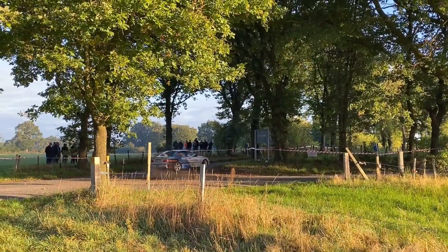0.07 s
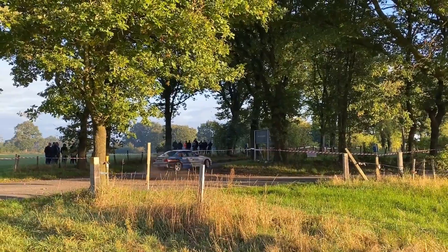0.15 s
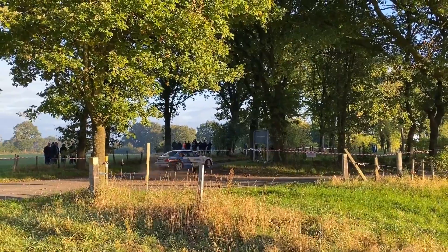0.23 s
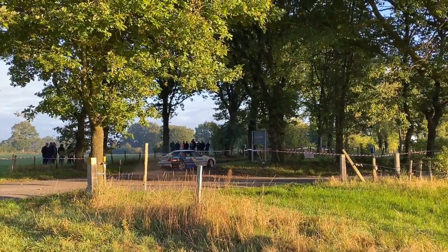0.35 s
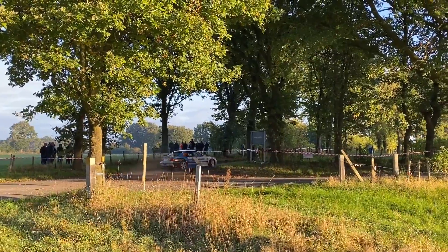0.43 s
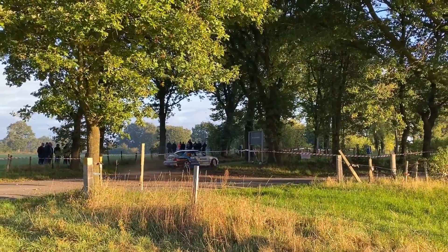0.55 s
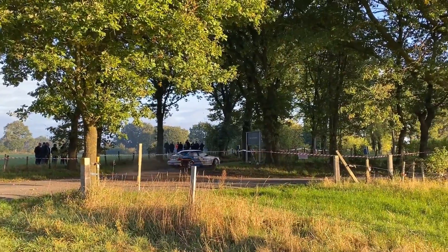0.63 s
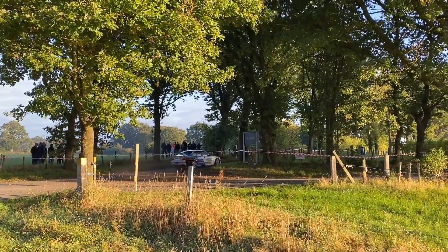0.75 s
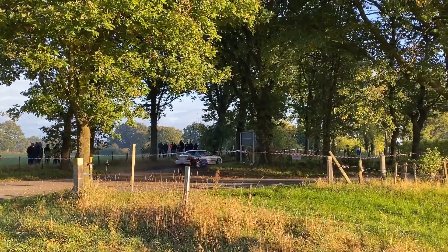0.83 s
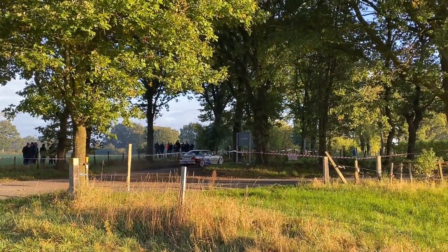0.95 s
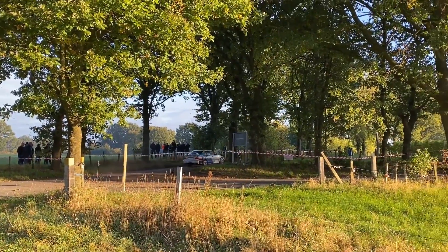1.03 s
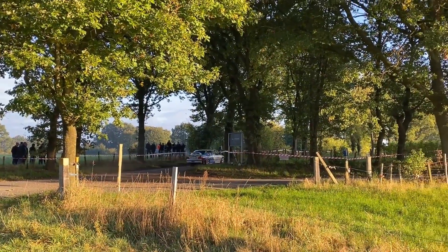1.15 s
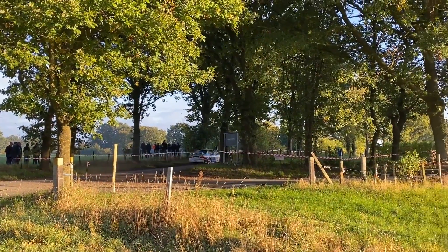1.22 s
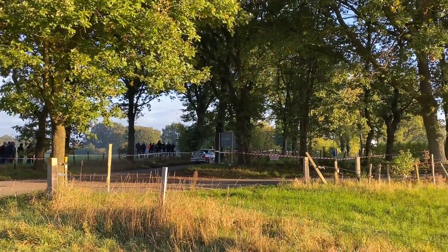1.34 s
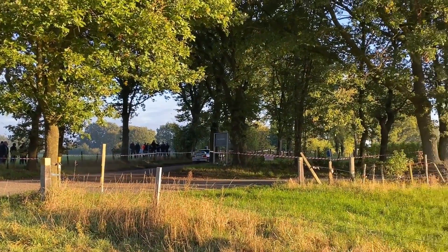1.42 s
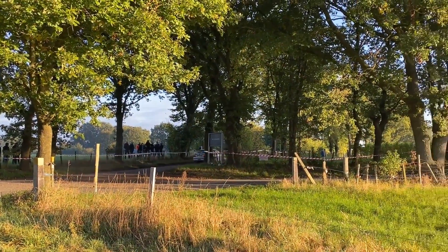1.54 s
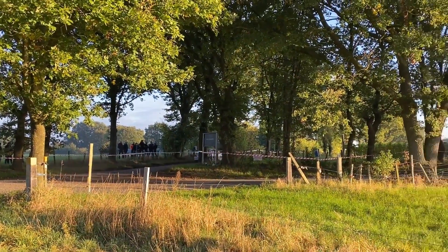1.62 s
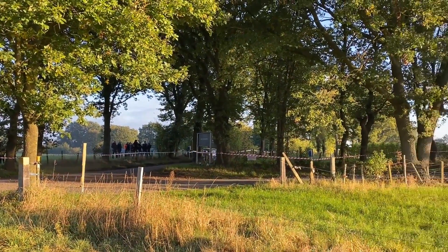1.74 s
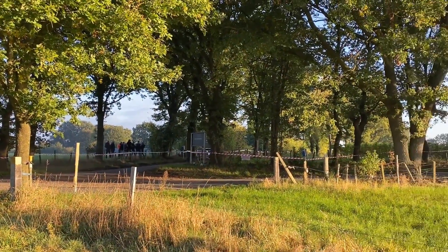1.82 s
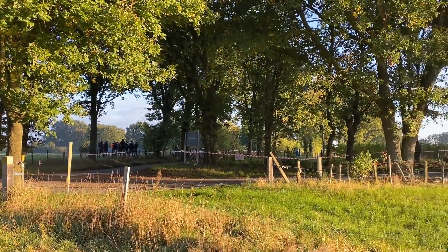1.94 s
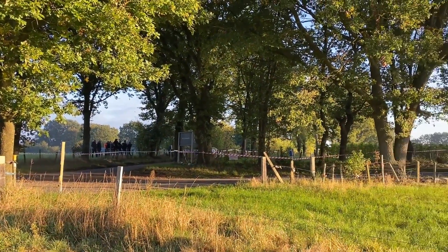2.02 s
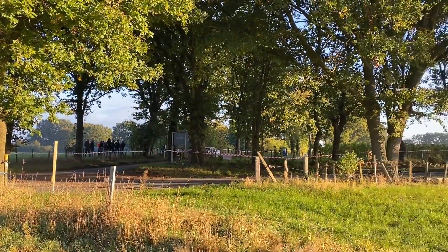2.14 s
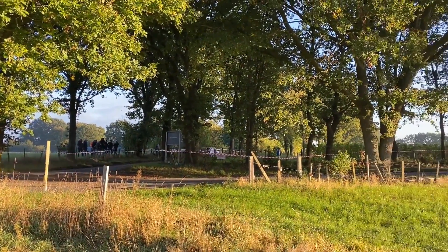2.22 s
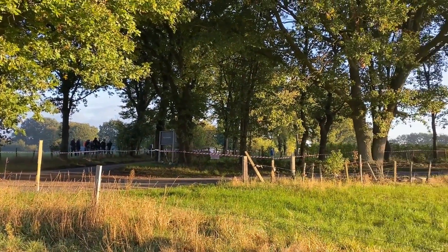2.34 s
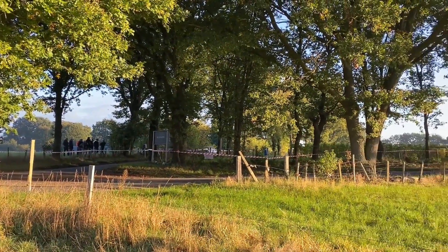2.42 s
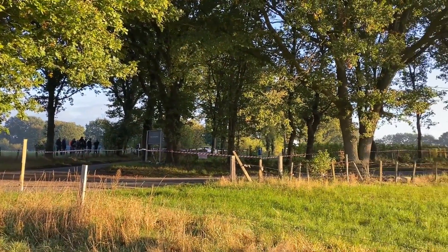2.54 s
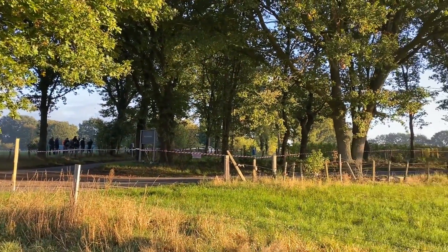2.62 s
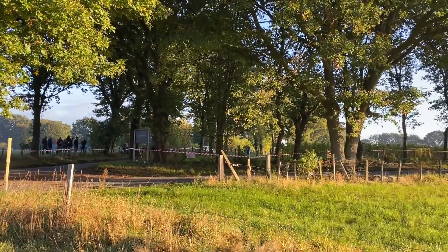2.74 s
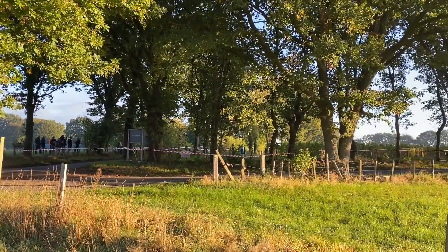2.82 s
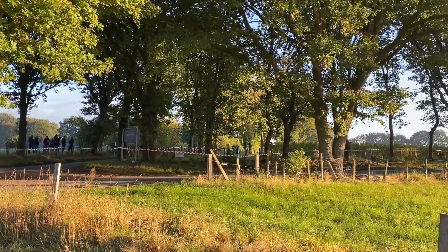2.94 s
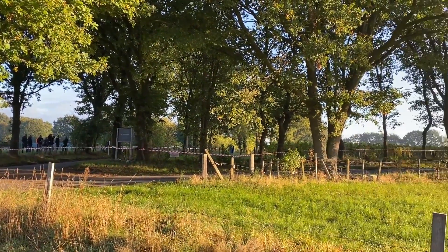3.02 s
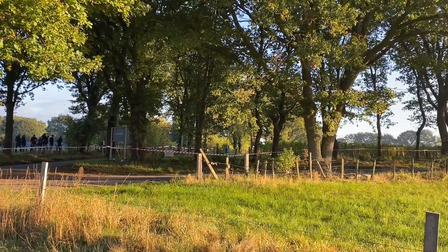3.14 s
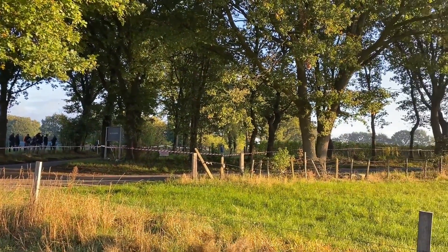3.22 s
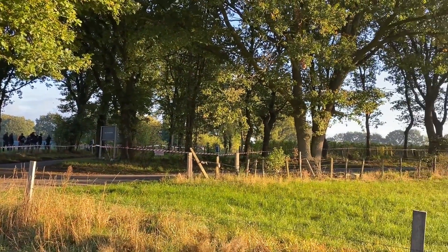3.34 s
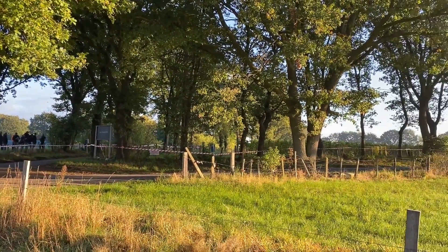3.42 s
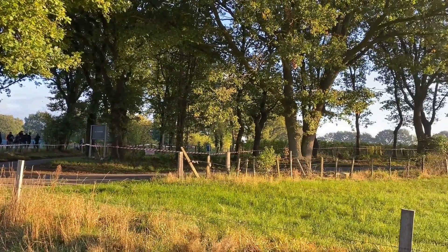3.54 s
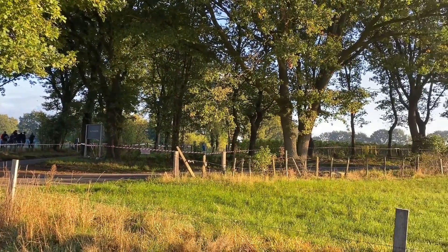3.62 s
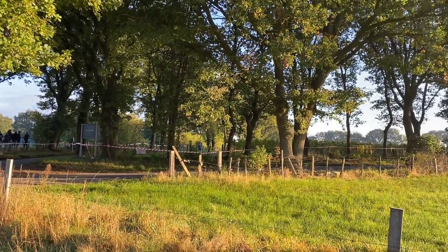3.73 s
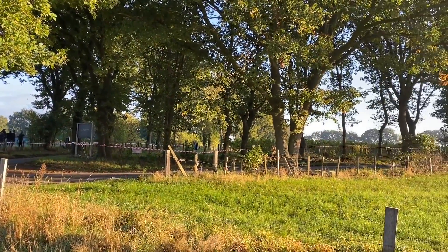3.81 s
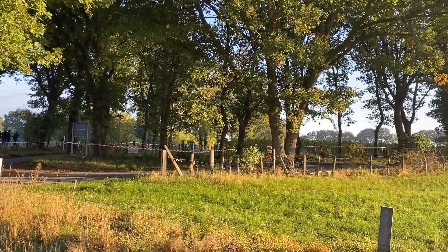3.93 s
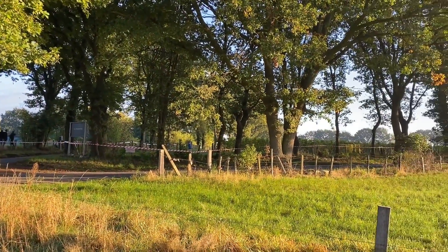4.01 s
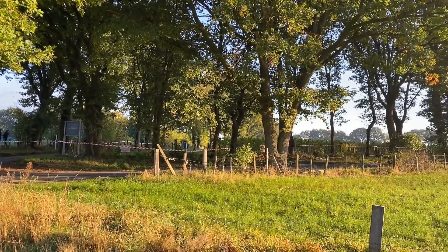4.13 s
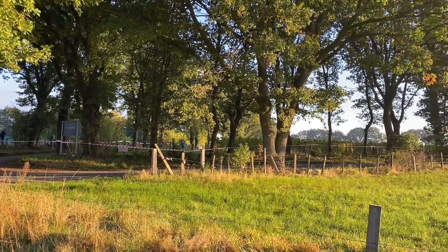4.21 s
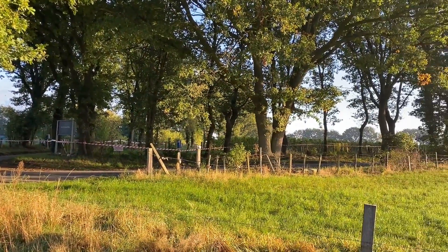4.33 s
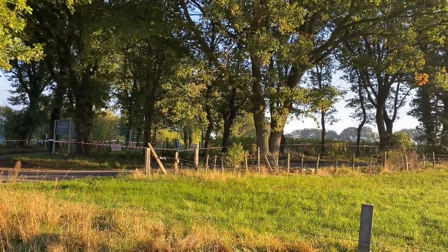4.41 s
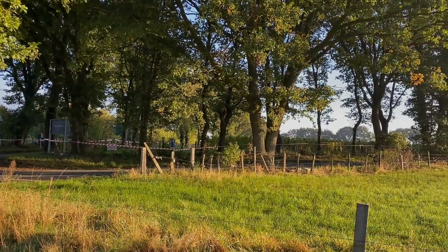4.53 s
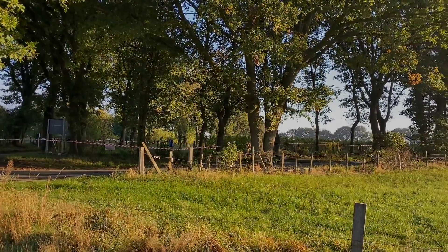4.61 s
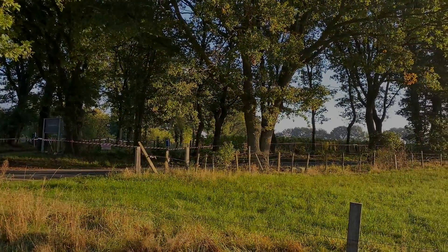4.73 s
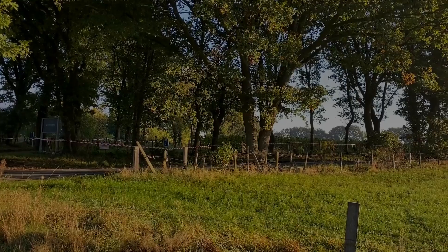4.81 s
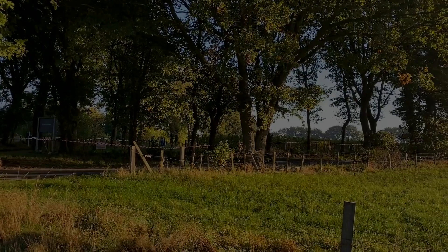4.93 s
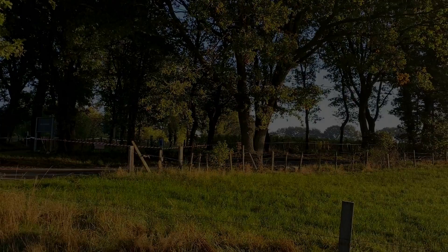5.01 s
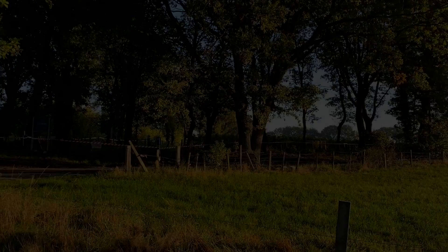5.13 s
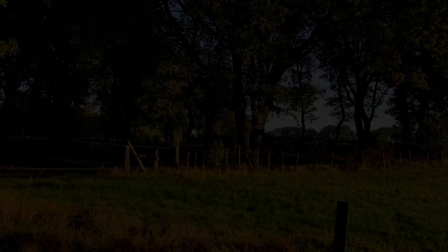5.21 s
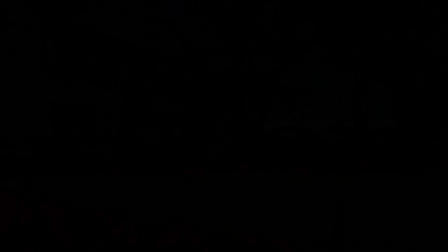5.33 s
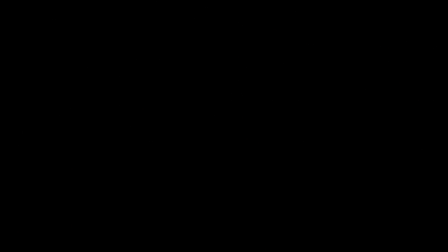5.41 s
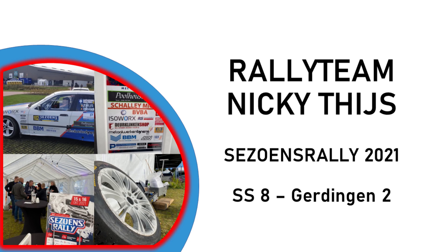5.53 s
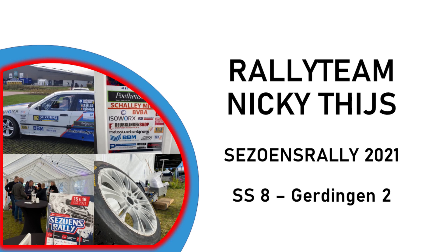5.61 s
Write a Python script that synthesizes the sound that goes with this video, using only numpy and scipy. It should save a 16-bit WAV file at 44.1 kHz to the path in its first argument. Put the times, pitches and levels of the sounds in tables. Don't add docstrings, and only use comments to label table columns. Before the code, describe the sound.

A four-cylinder rally car slides out of a corner with tyre chirps, then accelerates away through two gear changes and fades to silence.

```python
import sys
import numpy as np
from scipy import signal
from scipy.fft import rfft, irfft, next_fast_len
from scipy.io import wavfile
from scipy.ndimage import uniform_filter1d

SR = 44100
rng = np.random.default_rng(int(sys.argv[2]) if len(sys.argv) > 2 else 0)


def to_wav(s):
    ch = np.atleast_2d(s).T
    pcm = np.round(np.clip(ch, -1, 1) * 32767)
    wavfile.write(sys.argv[1], SR, pcm.astype(np.int16))


def gain_from_db(level_db):
    decades = np.asarray(level_db, float) / 20
    return 10 ** decades


N = 250047

# time_s, crank_hz
CRANK_SPEED = [(0.0, 105.7), (0.15, 100.6), (0.46, 106.3), (0.69, 106.9), (0.85, 104.7), (1.3, 89.15),
               (1.42, 89.2), (1.83, 105.2), (2.58, 132.2), (2.86, 142.3), (3.13, 139.0), (3.19, 130.7),
               (3.3, 123.3), (4.19, 145.3), (4.36, 140.8), (4.53, 119.1), (4.63, 124.4), (5.38, 135.4)]
# lift_s, pick_up_s, clutch_wait_s
GEAR_CHANGES = [
    (2.915, 3.098, 0.038),
    (4.142, 4.287, 0.08),
]
# time_s, level_db, tailpipe_aim_db, brightness_db, cylinder_unevenness_db
EXHAUST_DRIVE = [(0, -15, -10.5, 1.5, -15), (.45, -14.5, -11, 2, -5.5), (.85, -18, -8, 1.5, -5),
                 (1.05, -15, -6, -1.5, 1.5), (1.25, -13.5, -8.5, 0.5, 4), (1.55, -15, -3.5, -5.5, 3.5),
                 (1.8, -23, -1.5, -2.5, -4), (2.05, -19.5, -6.5, -10.5, -2.5), (2.4, -23.5, -8, 2.5, -8.5),
                 (2.65, -28.5, 5.5, -8, 6.5), (2.92, -31, 2.5, 3.5, 13.5), (3.15, -29.5, 2, -11, 0),
                 (3.45, -26.5, -2, -2.5, -3), (3.8, -25, -5, -2.5, 2.5), (4.1, -32.5, -3, -19, 2),
                 (4.4, -30, -6, -9, 7), (4.7, -30.5, -5, 0.5, 11.5), (5.2, -31.5, -7.5, -4, -5)]
# multiple_of_crank, level_re_lead_db, unsteadiness_db
CRANK_ORDERS = [(1, -23.5, 0), (1.5, -36.5, -3), (2, -1, 1), (3, -16.5, 2.4), (4, 2, 1.6), (5, -5.5, 1.8),
                (6, -1.5, 2)]
# freq_hz, gain_db
HEADER_GAIN = [(350, -6.5), (410, -2.5), (470, -2), (530, 2), (580, -1.5), (650, 3.5), (750, -4), (870, -5)]
# freq_hz, gain_db
PIPE_GAIN = [(600, 4), (830, -4.5), (960, -7), (1060, -15.5), (1300, -25), (1520, -26), (1800, -16),
             (2100, -34.5), (2600, -27)]
# time_s, freq_hz, gain_db, half_length_s
PASSING_DIPS = [(0.115, 202, -7, 0.037), (0.115, 416, -9.5, 0.039), (1.216, 823, 6.5, 0.17),
                (0.375, 208, -8, .07), (0.346, 422, -2, 0.031), (0.398, 528, -10, 0.03),
                (.45, 638, -8.5, 0.034), (0.64, 614, 4.5, 0.053), (0.645, 855, -16, 0.026),
                (1.03, 479.7, -16, 0.088), (1.592, 610, 9.5, 0.088), (2.124, 232, -6, 0.068),
                (2.265, 487, -6.5, 0.059), (2.465, 646, -10, .06), (2.332, 736, -15, 0.026),
                (2.5, 520, -8, 0.053), (2.6, 532, 2, 0.031), (2.726, 556.2, -14, 0.087),
                (2.74, 836, -13, 0.069), (3.147, 550, 3.5, 0.033), (3.19, 525, -16, .02),
                (3.23, 769, -22, 0.051), (3.562, 779, -19, 0.057), (3.691, 264.5, -7, 0.036),
                (3.9, 555, -8, 0.065), (3.94, 685, -1, 0.048), (3.7, 530, -10, 0.23),
                (4.125, 575, -5, 0.035), (4.563, 490, -6, 0.049), (2.3, 706, 1.5, 0.11)]
# time_s, gas_force_db, pipe_boom_db, road_roughness_db
GAS_AND_ROAD = [(0, -42, -1, 0.5), (.1, -41, -1, 4), (.4, -38, -3.5, 2.5), (.6, -36.5, -4, 0),
                (.8, -40, -0.5, -2.5), (1.05, -38.5, 1, 1.5), (1.3, -41, -0.5, -0.5),
                (1.6, -40.5, -0.5, -4), (1.9, -42, 0, 3.5), (2.2, -40.5, 0, 5), (2.45, -39.5, 3, 1.5),
                (2.9, -34.5, -4, -2.5), (3.2, -41.5, 3, 3), (3.5, -39.5, -1, 0.5), (4.1, -36.5, -4.5, -1),
                (4.4, -42, 3.5, 1.5), (4.6, -42.5, -1.5, 2), (5, -43, 0, 1)]
# freq_hz, level_db
RUMBLE_SPECTRUM = [(20, -37), (45, -12.5), (85, 7.5), (140, 1.5), (260, 8), (500, -50.5)]
# freq_hz, level_db
ROAR_SPECTRUM = [(100, -30), (200, -8), (350, -1), (620, 5.5), (900, 3), (1250, -7), (1600, -22.5)]
# freq_hz, level_db
RASP_SPECTRUM = [(800, -31.5), (1250, 3), (1550, -6), (1900, 0.3), (2350, -3), (2800, -12), (3600, -49.5)]
# freq_hz, level_db
HISS_SPECTRUM = [(2200, -6), (3100, 1), (4500, -3), (6000, -9), (8200, -9), (11000, -23.5), (16000, -46)]
# freq_hz, likeness_0_to_1
CHANNEL_LIKENESS = [(60, 1), (180, 1), (550, 0.51), (1650, 1), (4970, 0.47), (15000, 0.29)]
# start_s, length_s, pitch_hz, glide_hz_per_s, level_db
TYRE_CHIRPS = [
    (0.038, 0.079, 1393, -3200, -28.5),
    (0.402, 0.16, 1173, -300, -29.5),
    (0.54, 0.064, 1245, -400, -23.5),
    (0.588, 0.053, 1201, -200, -24.5),
    (0.651, 0.081, 1195, 53, -23),
    (0.73, 0.043, 1237, -300, -25),
]
# time_s, level_db, pitch_hz, t60_s
PIPE_THUMPS = [
    (2.919, -27.5, 162.2, 0.11),
    (3.076, -24, 515, 0.022),
    (3.097, -26, 104, 0.073),
    (4.152, -28, 109.5, 0.06),
    (4.215, -35.5, 151.3, .06),
    (4.286, -24.5, 189, 0.0505),
    (4.451, -20, 610, 0.031),
]
# freq_hz, left_minus_right_db
MIC_LEAN = [(40, 3.5), (150, -1.6), (350, -0.2), (700, 3), (1400, 2), (2800, 2.5), (5500, 3), (10000, -1.5)]
# freq_hz, left_lead_rad
MIC_LEAD = [(60, .05), (200, 0.28), (400, 0.51), (650, 0.46), (1000, 1), (2500, 0.94), (6000, 0.39)]
# low_hz, high_hz, open_share, gain_db
MID_BANDS = [(8300, 8650, .85, 3), (8650, 8850, .3, 1), (9300, 9600, .08, 1), (9640, 9810, 1.2, 13),
             (10000, 10400, .08, 1), (10450, 11280, .9, 3), (11950, 12420, .9, 5), (12600, 13500, .1, 1),
             (13850, 14280, .75, 6), (14400, 15000, .06, 1), (15050, 15780, .2, 3)]
# low_hz, high_hz, open_share, gain_db
SIDE_BANDS = [(8300, 9050, .2, 3), (9700, 10250, 1.1, 6), (10400, 11100, .08, 1), (11700, 12050, .85, 9),
              (12700, 13500, .75, 3), (13700, 14100, .08, 1), (14200, 14500, .5, 8)]


def evened(x):
    return x / np.sqrt(np.mean(x ** 2) + 1e-20)


def read(points, hz):
    f, value = np.transpose(points)
    return np.interp(np.log(hz + 1), np.log(f + 1), value)


def curves(table):
    s, *columns = np.transpose(table)
    return [np.interp(np.arange(N) / SR, s, c) for c in columns]


def wander(hz, count):
    slow_rate_hz = 400
    white = rng.standard_normal((count, N * slow_rate_hz // SR + 100))
    slow = signal.lfilter(*signal.butter(2, hz / (slow_rate_hz / 2)), white)
    steps = np.arange(N) * slow_rate_hz / SR + 90
    return np.array([np.interp(steps, np.arange(len(row)), evened(row)) for row in slow])


def lifted(fall_s, rise_s, waits):
    t = np.arange(N) / SR
    shut = np.zeros(N)
    for lift_s, pick_s, bite_s in GEAR_CHANGES:
        closing = (t - lift_s) / fall_s
        opening = (pick_s + waits * bite_s - t) / rise_s + 0.5
        shut += np.clip(np.minimum(closing, opening), 0, 1)
    return shut


def crank_turns():
    unevenness = 1 + 0.002 * wander(hz=20, count=1)[0]
    return np.cumsum(curves(CRANK_SPEED)[0] * unevenness) / SR


def passing_dip_db(hz):
    step, spread = 256, 0.091
    t = np.arange(0, N, step) / SR
    gain_db = np.zeros(len(t))
    for s, at_hz, db, half_s in PASSING_DIPS:
        off_time = (t - s) / half_s
        off_pitch = np.log(hz[::step] / at_hz) / spread
        gain_db += db * np.exp(-off_time ** 2 - off_pitch ** 2)
    return np.interp(np.arange(N) / SR, t, gain_db)


def exhaust(turns):
    top_order, rougher_per_s = 22, 0.08
    lift_firing_db, lift_upper_db = -13, -23.5
    hz = curves(CRANK_SPEED)[0]
    level, aim, bright, uneven = curves(EXHAUST_DRIVE)
    shut = lifted(fall_s=0.014, rise_s=0.034, waits=0)
    clutch_shut = lifted(fall_s=0.032, rise_s=0.047, waits=1) ** 0.4
    firing = level + lift_firing_db * shut
    upper = level + aim + lift_upper_db * shut
    late = level + aim + lift_upper_db * clutch_shut
    rougher = 1 + rougher_per_s * np.arange(N) / SR

    orders = [*CRANK_ORDERS, *((k, 0, 1.4) for k in range(7, top_order + 1))]
    fades, slips, drifts, spreads = (wander(hz=f, count=len(orders)) for f in (5.6, 42, 1.35, 8.6))
    out = np.zeros((2, N))
    for (k, db, unsteady_db), fade, slip, drift, spread in zip(orders, fades, slips, drifts, spreads):
        if k < 2:
            lead = firing + 0.22 * uneven
        elif k == 2:
            lead = firing
        elif k == 3:
            lead = firing + uneven
        elif k == 4:
            lead = upper + read(HEADER_GAIN, k * hz)
        elif k <= 6:
            lead = late + read(HEADER_GAIN, k * hz)
        else:
            lead = late + bright + read(PIPE_GAIN, k * hz)
        order_db = lead + db + unsteady_db * rougher * fade
        if k < 10:
            order_db = order_db + passing_dip_db(k * hz)
        phase = 2 * np.pi * k * turns + np.pi * (k == 2) + np.pi / 2 * (k % 2)
        phase = phase + k * slip / 30 + drift * min(k - 2, 3) / 6
        apart = 0.03 * k * spread * np.array([[1], [-1]])
        out += np.sqrt(2) * gain_from_db(order_db) * np.cos(phase + apart)
    return out


def noise(shape, patchy_db, size=8):
    air_db_per_s = 3
    hz = np.fft.rfftfreq(1024, 1 / SR)
    a, b, c, d, patches = rng.standard_normal((N // 256 + 5, 513, 5)).T
    patches = uniform_filter1d(patches, size=size, axis=0)
    patches = evened(uniform_filter1d(patches, size=10, axis=1))
    same = read(CHANNEL_LIKENESS, hz)[:, None]
    left = a + 1j * b
    right = same * left + np.sqrt(1 - same ** 2) * (c + 1j * d)
    z = np.array([left, right])
    frame_s = np.arange(z.shape[2]) * 256 / SR
    air_loss_db = air_db_per_s * np.outer((hz / 12000) ** 2, frame_s)
    z = z * gain_from_db(read(shape, hz)[:, None] + patchy_db * patches - air_loss_db)
    return evened(signal.istft(z, nperseg=1024, noverlap=768)[1][:, :N])


def road_rumble():
    level_db, loss_db_per_s, lift_db = -38.5, -1.5, 6.5
    _, _, road = curves(GAS_AND_ROAD)
    shut = lifted(fall_s=0.011, rise_s=0.03, waits=0.4)
    rumble_db = level_db + road + loss_db_per_s * np.arange(N) / SR + lift_db * shut
    return gain_from_db(rumble_db) * noise(RUMBLE_SPECTRUM, patchy_db=0.0)


def gas_noise(turns):
    lift_gas_db, lift_roar_db, roar_db = -13, -9.5, 3
    slide_db, grip_s, grip_over_s = 8, 2.93, 2.54
    t = np.arange(N) / SR
    gas, boom, _ = curves(GAS_AND_ROAD)
    shut = lifted(fall_s=0.15, rise_s=0.072, waits=0.42) ** 0.56
    scrub = 2 + slide_db * np.clip((grip_s - t) / grip_over_s, 0, 1)
    pipe_db = gas + scrub + boom + roar_db + lift_roar_db * shut
    hiss_db = gas + lift_gas_db * shut
    rasp_db = hiss_db + scrub
    puffs = 1 + 0.11 * np.cos(4 * np.pi * turns) + 0.1 * np.cos(2 * np.pi * turns)
    grit = gain_from_db(0.27 * wander(hz=39.6, count=1))
    roar = gain_from_db(pipe_db) * noise(ROAR_SPECTRUM, patchy_db=3.0) * puffs
    rasp = gain_from_db(rasp_db - 2.72) * noise(RASP_SPECTRUM, patchy_db=3.5, size=2) * puffs
    hiss = gain_from_db(hiss_db + 1.24) * noise(HISS_SPECTRUM, patchy_db=2.5, size=3) * grit * puffs ** 0.27
    return roar + rasp + hiss


def tyre_squeal(start_s, length_s, pitch_hz, glide_hz_per_s, level_db):
    octave_db, edge_s = -12, 0.015
    t = np.arange(N) / SR - start_s
    hz = pitch_hz + glide_hz_per_s * np.clip(t, 0, length_s)
    turns = np.cumsum(hz * (1 + 0.015 * wander(hz=40, count=1)[0])) / SR
    sliding = np.clip(np.minimum(t, length_s - t) / edge_s, 0, 1)
    tone = np.cos(2 * np.pi * turns) + gain_from_db(octave_db) * np.cos(4 * np.pi * turns)
    return sliding * gain_from_db(level_db + 3.9 * wander(hz=50, count=1)[0]) * tone


def pipe_thumps():
    attack_s = 0.00083
    out = np.zeros(N)
    t = np.arange(SR // 4) / SR
    for s, db, hz, t60_s in PIPE_THUMPS:
        at = round(s * SR)
        ring = gain_from_db(db - 60 * t / t60_s) * np.sin(2 * np.pi * hz * t)
        out[at:at + len(t)] += ring * (1 - np.exp(-t / attack_s))
    return out


def scene():
    fade_s, fade_db_per_s, dive_db, end_s = 4.479, -58, -3, 5.405
    t = np.arange(N) / SR
    turns = crank_turns()
    mix = exhaust(turns) + road_rumble() + gas_noise(turns)
    mix = mix + sum(tyre_squeal(*row) for row in TYRE_CHIRPS) + pipe_thumps()
    late = np.maximum(t - fade_s, 0)
    mix = mix * gain_from_db(fade_db_per_s * late + dive_db * late ** 4)
    return mix * np.clip((end_s - t) / 0.01, 0, 1)


def thinned_treble(x, bands):
    floor_hz = 8300
    hz, _, z = signal.stft(x, SR, nperseg=2048)
    blocks = z.shape[1]
    treble_db = 10 * np.log10(np.mean(abs(z[hz > floor_hz]) ** 2, 0) + 1e-20)
    spare = np.maximum(0.05 * (treble_db - np.median(treble_db)), -0.3)
    gain = (hz < floor_hz)[:, None] * np.ones(z.shape)
    for low_hz, high_hz, share, db in bands:
        chance = share + spare * min(1, 3 * share) * (low_hz / 12500) ** 3
        whole = uniform_filter1d(rng.random(blocks), size=2)
        in_band = np.flatnonzero((hz >= low_hz) & (hz < high_hz))
        for rows in np.array_split(in_band, 2):
            draw = 0.7 * whole + 0.3 * rng.random(blocks)
            gain[rows] = gain_from_db(db - 2.5) * (draw < 0.25 + chance / 2)
    return signal.istft(z * gain, SR, nperseg=2048)[1][:N]


def low_pass(x):
    return signal.sosfilt(signal.butter(12, 15950, fs=SR, output="sos"), x)


def record(dry):
    bass_cut_hz = 62
    size = next_fast_len(N + SR)
    hz = np.fft.rfftfreq(size, 1 / SR)
    lean = gain_from_db(read(MIC_LEAN, hz) / 2) * np.exp(0.5j * read(MIC_LEAD, hz))
    bass_cut = 1 / np.sqrt(1 + (bass_cut_hz / (hz + 1)) ** 4)
    spectrum = rfft(dry, size, axis=1) * bass_cut * np.array([lean, 1 / lean])
    left, right = irfft(spectrum, size, axis=1)[:, :N]
    mid = thinned_treble((left + right) / 2, MID_BANDS)
    side = thinned_treble((left - right) / 2, SIDE_BANDS)
    return low_pass(np.array([mid + side, mid - side]))


dry = scene()
out = record(dry)
to_wav(out)
```